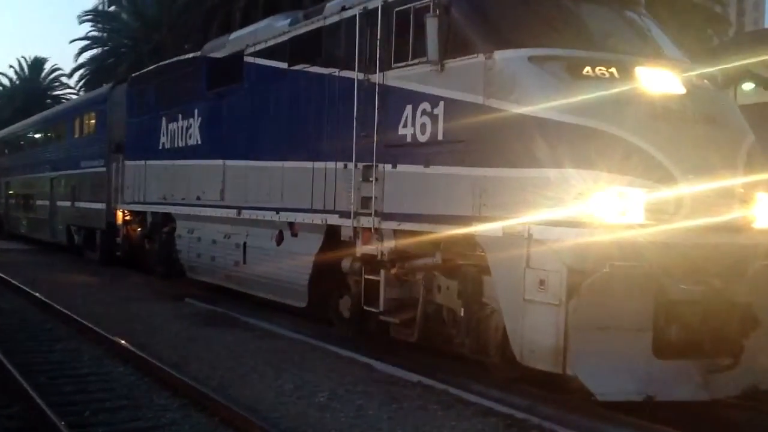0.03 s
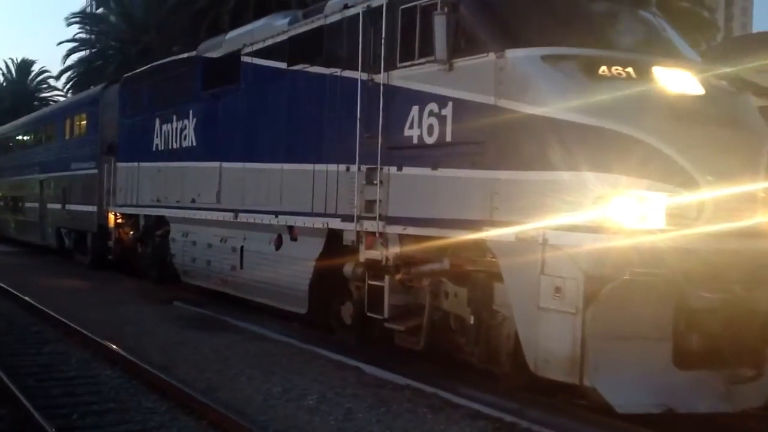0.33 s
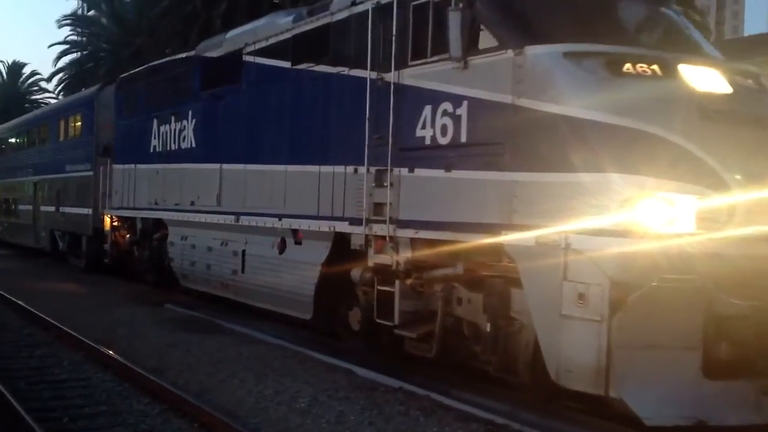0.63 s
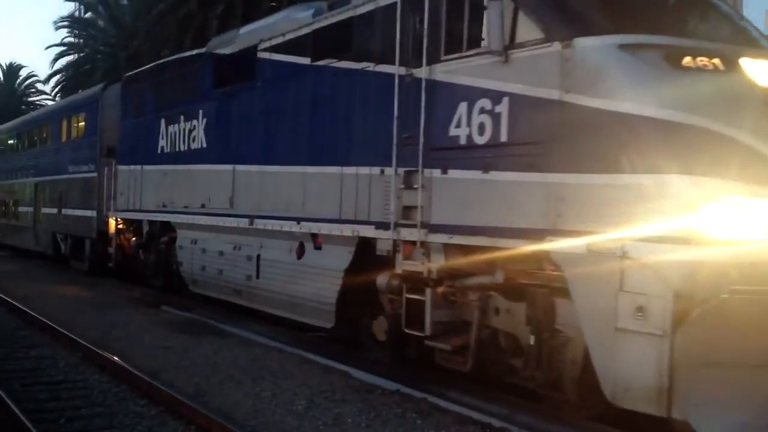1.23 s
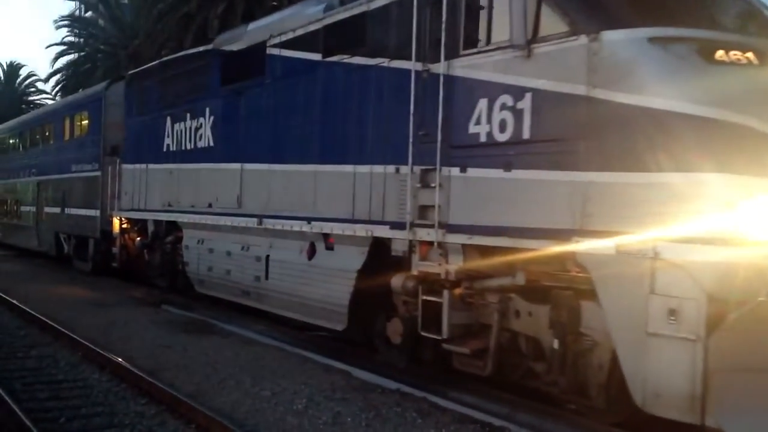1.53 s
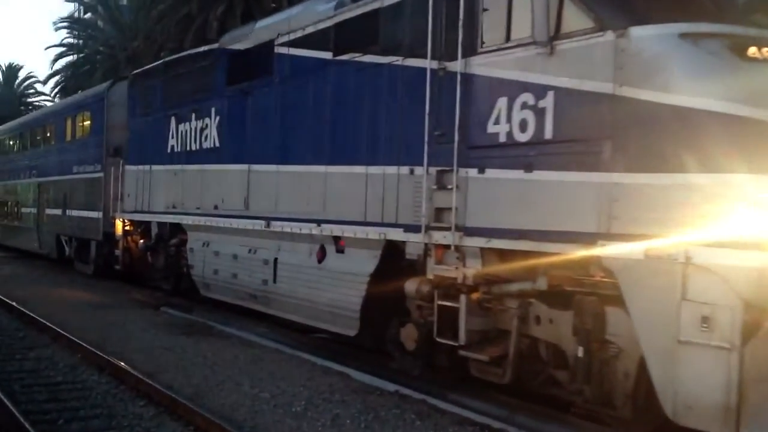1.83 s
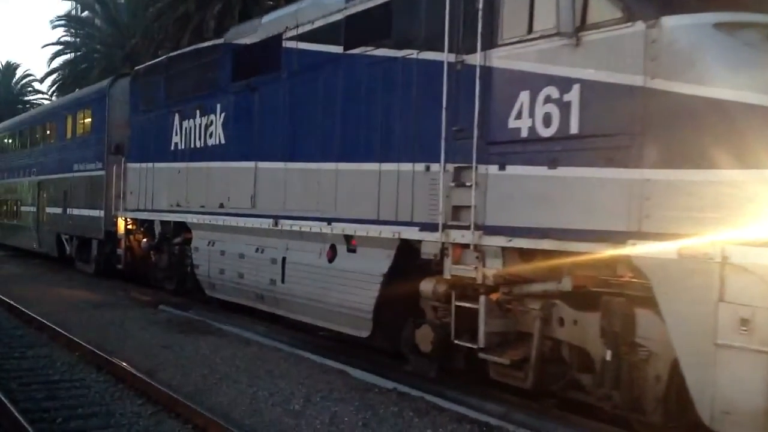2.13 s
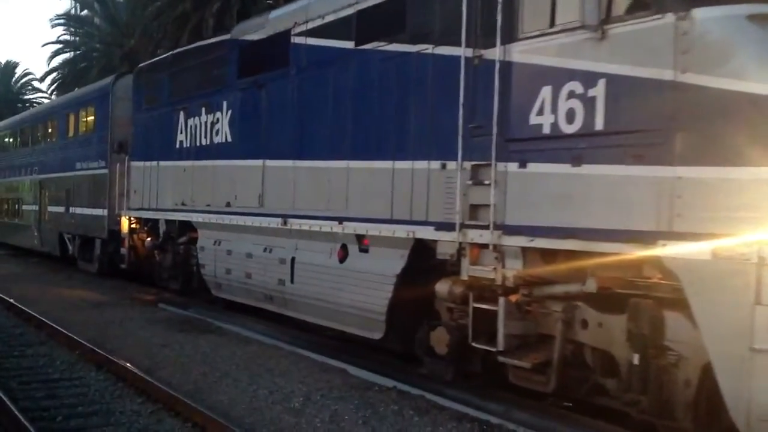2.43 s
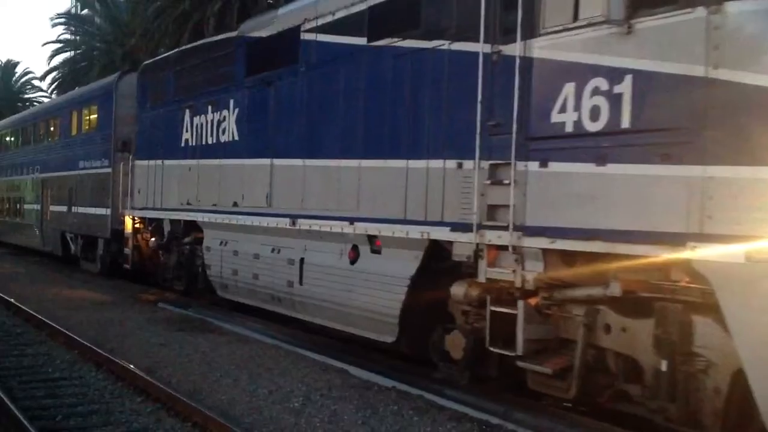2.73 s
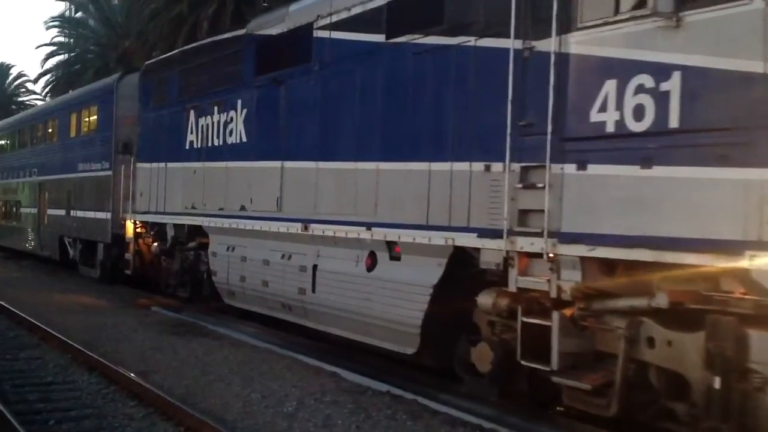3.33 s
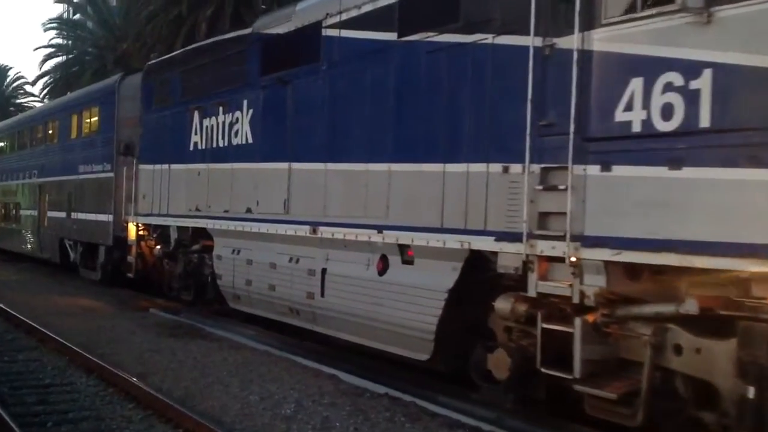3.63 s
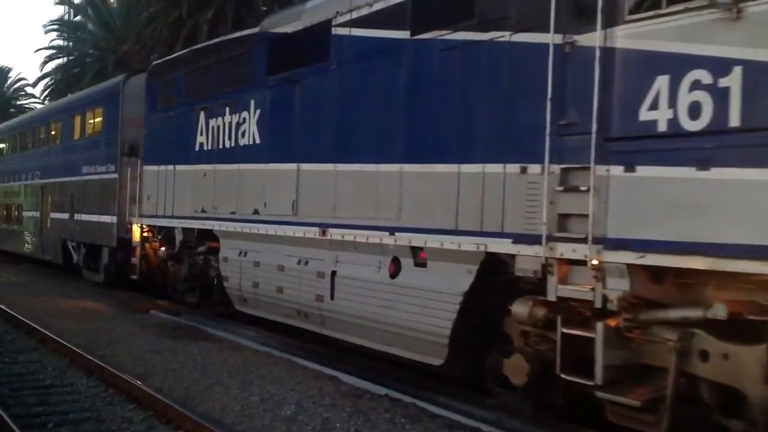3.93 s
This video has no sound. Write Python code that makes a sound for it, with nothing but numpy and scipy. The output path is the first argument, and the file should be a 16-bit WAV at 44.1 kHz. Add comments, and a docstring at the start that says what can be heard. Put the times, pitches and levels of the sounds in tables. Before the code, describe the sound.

A train bell rings steadily as a diesel locomotive rolls slowly past, releasing air.

```python
"""A bell rings out once a second over the rumble and whine of a diesel locomotive rolling slowly past.
Its decaying partials beat against their Doppler-shifted echoes from the station wall.
Firing pulses and exhaust roar make the rumble; fans and turbocharger make the whine.
Turbulent jets add hiss: air leaks faintly and is blown off twice, and the bell's air-driven ringer
spits and puffs between strokes. One microphone with a limiter picks it all up."""
import sys
import numpy as np
from scipy.fft import rfft, irfft, next_fast_len
from scipy.io import wavfile
from scipy.ndimage import uniform_filter1d, map_coordinates

SR = 44100
rng = np.random.default_rng(int(sys.argv[2]) if len(sys.argv) > 2 else 0)


def materialize(psi):
    """Save the field psi as 16-bit PCM at rate SR to the path in sys.argv[1].

    A 1-D psi becomes a single channel; in a 2-D psi each row is a channel.
    """
    bounded = np.clip(np.atleast_2d(psi).T, -1, 1)
    quanta = np.round(bounded * 32767).astype(np.int16)
    wavfile.write(sys.argv[1], SR, quanta)


N = 176400
TIME = np.arange(N) / SR

# bell strokes (time [s], level [dB], tilt [dB/octave], swell of the strongest partial [s],
# echo's Doppler shift [%], echo's initial gain [dB], gain of the middle partials [dB])
STROKES = [(-.02, -1.5, -2.5, 0.01, 0.382, -9, -1), (.946, 0, -1.5, .005, 0.186, -8, -3),
           (1.972, -2, 1, 0.0051, 0.237, -3, 1.5), (2.979, 1, -2, 0.061, 0.06, -6.5, 0),
           (3.957, 0.5, .5, 0.0082, 0.53, -4, -6)]


def amp(db):
    """Decibels to amplitude ratio."""
    return 10 ** (np.asarray(db) / 20)


def unit(x):
    """Normalisation to rms 1."""
    return x / np.sqrt(np.mean(np.abs(x) ** 2) + 1e-20)


def curve(rows):
    """Linear interpolation of (time [s], value) points at every sample."""
    return np.interp(TIME, *np.transpose(rows))


def wobble(rate):
    """Smooth random modulation: a spline through rate knots a second."""
    coarse = map_coordinates(rng.standard_normal(int(N * rate / SR) + 6), [TIME[::32] * rate + 2])
    return np.interp(TIME, TIME[::32], coarse)


def fading(rate):
    """Multipath fading: the random complex gain of a tone arriving over many changing paths."""
    return unit(wobble(rate) + 1j * wobble(rate))


def tone(hz, flutter, width_hz):
    """Line broadening: a sine of rms 1 flutters in level and phase."""
    gain = 1 + flutter * fading(width_hz)
    return unit(np.real(gain * np.exp(2j * np.pi * (hz * TIME + rng.random()))))


def filtered(x, response):
    """Linear filtering: the spectrum of x times a frequency response."""
    size = next_fast_len(N + 8192)
    return irfft(rfft(x, size) * response(np.fft.rfftfreq(size, 1 / SR)), size)[:N]


def coloured(x, spectrum, tilt_db=0):
    """Spectral shaping by (frequency [Hz], gain [dB]) points and a tilt per octave, at rms 1."""
    knots_hz, db = np.transpose(spectrum)
    tilted_db = db + tilt_db * np.log2(knots_hz / knots_hz[0])
    return unit(filtered(x, lambda hz: amp(np.interp(np.log(hz + 1), np.log(knots_hz), tilted_db))))


def noise(spectrum, tilt_db=0):
    """Coloured Gaussian noise of rms 1."""
    return coloured(rng.standard_normal(N), spectrum, tilt_db)


def burst(start, end, rise, t60):
    """Envelope: linear rise from start, hold until end, exponential decay."""
    return np.clip((TIME - start) / rise, 0, 1) * amp(-60 * np.maximum(TIME - end, 0) / t60)


def bell():
    """Interference: damped modes beat against their Doppler-shifted echo and scattered sound."""
    # bell modes (frequency [Hz], relative level [dB], t60 [s], rise [s])
    modes = [(2118, -10, .38, .05), (2375, -5, .85, .004), (3009, -34, .35, .003), (3720, -23, .75, .025),
             (3914, -18.5, 1.5, .005), (5171, -31, .25, .003), (5764, -21.5, .48, .012),
             (5956, -28.5, .35, .005), (6064, -35, .4, .005), (6242, -27, .42, .005), (7734, -34, .6, .004),
             (7852, -27.5, .85, .005), (8685, -54, .5, .003), (10052, -37, .7, .004),
             (10347, -49, .4, .003), (12352, -45, .5, .002), (14740, -51, .28, .002)]
    echo_delay_s, echo_rise_s, echo_growth_db_per_s = 0.052, 0.051, 9
    scatter_share, scatter_db_per_octave, doppler_spread, scatter_rise_s = 0.42, 6.5, 0.007, 0.05
    strongest_hz = max(modes, key=lambda mode: mode[1])[0]
    out = np.zeros(N)
    for hz, db, t60, rise in modes:
        octaves = np.log2(hz / strongest_hz)
        scatter = scatter_share * amp(scatter_db_per_octave * octaves) * fading(doppler_spread * hz)
        wander_rad = octaves * wobble(12)  # high partials beat less evenly
        for start, stroke_db, tilt_db, swell, shift_percent, echo_db, middle_db in STROKES:
            live = (TIME >= start) & (TIME < start + 1.5 * t60)
            t = TIME[live] - start
            onset = np.minimum(t / swell, 1) ** 2 if hz == strongest_hz else 1
            colour_db = tilt_db * octaves + middle_db * (3500 < hz < 4500)
            envelope = onset * (1 - np.exp(-t / rise)) * amp(db + stroke_db + colour_db - 60 * t / t60)
            beat_hz = hz * shift_percent / 100
            echo_phase = 2 * np.pi * beat_hz * (t - echo_delay_s) + wander_rad[live]
            echo_gain = amp(np.minimum(echo_db + echo_growth_db_per_s * t, 0))
            echo_onset = np.clip((t - echo_delay_s) / echo_rise_s + 1, 0, 1)
            echo = echo_gain * echo_onset * np.exp(1j * echo_phase)
            paths = 1 + echo + scatter[live] * np.minimum(t / scatter_rise_s, 1)
            out[live] += envelope * np.real(paths * np.exp(2j * np.pi * (hz * t + rng.random())))
    return out


def clapper():
    """Impact excitation: each blow on the bell gives a brief broadband clank."""
    # clank spectrum (frequency [Hz], relative level [dB])
    spectrum = [(300, -70), (900, -6), (1500, -20), (2200, 4.5), (3000, -7), (4500, -16.5), (6000, -7.5),
                (8500, -37), (15000, -42)]
    blows = sum(amp(db - 19) * burst(start, start, rise=0.0025, t60=0.19) for start, db, *_ in STROKES)
    return blows * noise(spectrum)


def bell_hum():
    """Amplitude modulation: the long-lived lowest partial swells and fades as the bell moves."""
    # hum contour (time [s], relative level [dB])
    levels = [(0.0, -40), (0.28, -40.5), (0.33, -52), (0.43, -35.5), (0.91, -49), (1.2, -29.5),
              (1.3, -39.5), (1.46, -30.5), (1.92, -52.5), (2.0, -28), (2.28, -45), (3.05, -36.5),
              (3.16, -47.5), (3.41, -27), (3.63, -35), (3.75, -51), (3.92, -52), (4.0, -30)]
    return amp(curve(levels) + 3) * tone(1105.8, flutter=0.3, width_hz=13)


def exhaust():
    """Source and filter: unequal firing pulses and roar take on the exhaust's resonances."""
    # exhaust response (frequency [Hz], gain [dB])
    response = [(20, -50), (37, -43), (48, -15.5), (70, -18), (115, -16), (138, -1.5), (190, 3),
                (260, -1.5), (390, 0.5), (500, -11.5), (800, -9.5), (1400, -18), (2500, -42)]
    # rumble contour (time [s], level [dB])
    levels = [(0, -34), (.6, -30), (1.2, -32.5), (1.8, -30.5), (1.87, -27.5), (2.1, -31), (2.8, -28.5),
              (3.5, -30), (4, -27)]
    shaft_hz, cylinders, cylinder_spread, firing_db = 14.85, 12, 0.73, -8
    count = int(N / SR * shaft_hz * cylinders)
    sizes = np.resize(1 + cylinder_spread * unit(rng.standard_normal(cylinders)), count)
    time_jitter, size_jitter = rng.standard_normal((count, 2)).T
    times = (np.arange(count) + 0.247 * time_jitter) / (shaft_hz * cylinders)
    samples = np.clip(times * SR, 0, N - 1).astype(int)
    pulses = np.bincount(samples, sizes * (1 + 0.25 * size_jitter), N)
    firing = amp(firing_db) * coloured(pulses - pulses.mean(), response)
    roar = noise(response)
    chug = amp(0.74 * wobble(45))
    return amp(curve(levels)) * unit((roar + firing) * chug)


def machinery():
    """Rotational noise: shaft, fans and turbocharger radiate tones over a broadband rush."""
    # engine shaft orders (frequency [Hz], relative level [dB], flutter [ratio])
    shaft_tones = [(89, -50, .4), (134.8, -44.5, 0.73), (178.7, -44.5, 0.97), (237.4, -39, 0.28),
                   (539, -56, 1)]
    # fan and turbocharger whines (frequency [Hz], relative level [dB], flutter [ratio])
    whine_tones = [(904, -44, 0.37), (991, -54.5, .5), (3180, -44.5, 1.2), (5376, -46, 1.4),
                   (10770, -59, 1.2)]
    # the whines emerge as the locomotive nears (time [s], gain [dB])
    approach = [(0, -5), (1.05, -4), (1.3, -0.5), (4, 1)]
    # rush spectrum (frequency [Hz], relative level [dB])
    rush_spectrum = [(150, -65), (500, -10), (1400, -3), (2100, 7.5), (3200, 6.5), (4400, -3.5), (6000, -3),
                     (8000, -9), (10000, -21), (15000, -37)]
    # rush contour (time [s], level [dB])
    rush_levels = [(0, -36), (1.3, -36.5), (2, -35), (2.9, -34.5), (4, -32)]
    orders, whines = (
        sum(amp(db) * tone(hz, flutter, width_hz=6 + 0.006 * hz) for hz, db, flutter in tones)
        for tones in (shaft_tones, whine_tones))
    rush = amp(curve(rush_levels) + 0.39 * wobble(30.32)) * noise(rush_spectrum)
    return orders + amp(curve(approach)) * whines + rush


def air_leaks():
    """Turbulence: escaping air hisses faintly."""
    # leaks (start [s], end [s], level [dB], tilt [dB/octave])
    leaks = [(-.2, 0.425, -37, -11.5), (1.155, 1.378, -45.5, 14)]
    # hiss spectrum (frequency [Hz], relative level [dB])
    spectrum = [(500, -64), (5000, -7), (5900, 7), (7500, -1), (10000, -4), (13500, -1.5), (15500, -4)]
    return sum(amp(db) * burst(start, end, rise=0.06, t60=0.44) * noise(spectrum, tilt_db)
               for start, end, db, tilt_db in leaks)


def blowoffs():
    """Jet noise and resonance: a valve opens smoothly and air hisses through a whistling nozzle."""
    # valve openings (start [s], end [s], level [dB], tilt [dB/octave])
    openings = [(0.392, 0.721, -13, -1.5), (3.762, 4.2, -22.5, 0.2)]
    # jet spectrum (frequency [Hz], relative level [dB])
    spectrum = [(150, -70), (600, -21.5), (1500, -18), (2100, -10), (2650, -1.5), (3050, -2), (3550, 2),
                (4100, -5.5), (4900, -9), (6400, -2.5), (8000, -5), (10500, -11), (15000, -13)]
    # narrow nozzle resonances (frequency [Hz], relative level [dB])
    resonances = [(2686, -19), (3123, -19.5), (3548, -13.5), (7058, -23)]
    whistle = sum(amp(db) * tone(hz, flutter=3, width_hz=45) for hz, db in resonances)
    out = np.zeros(N)
    for start, end, db, tilt_db in openings:
        jet = noise(spectrum, tilt_db) + whistle
        out += amp(db + 0.23 * wobble(40)) * burst(start, end, rise=0.17, t60=0.34) * jet
    return out


def ringer():
    """Transient jets: the bell's air motor spits before a stroke and puffs on its return."""
    # spits of air (time [s], level [dB], t60 [s])
    spits = [(0.886, -30, 0.24), (1.812, -35.5, 0.47), (1.849, -43, 0.35), (1.904, -35, 0.52),
             (2.815, -32, 0.15), (2.845, -35, 0.39), (2.907, -30, 0.38)]
    # spit spectrum (frequency [Hz], relative level [dB])
    spit_spectrum = [(300, -48), (1500, -2), (3200, 4), (4500, -1.5), (7000, 1.5), (8500, -4), (9800, 2.5),
                     (11000, -15), (15000, -18)]
    # exhaust puffs (time [s], level [dB])
    puffs = [(1.668, -28), (2.666, -26), (3.642, -28)]
    # puff spectrum (frequency [Hz], relative level [dB])
    puff_spectrum = [(150, -58), (600, -20), (1400, -6), (2100, 8.5), (3000, 4.5), (4400, -11),
                     (6000, -1.5), (8500, -14), (9600, -6), (11500, -16.5), (15000, -23)]
    spitting = sum(amp(db) * burst(at, at + 0.0038, rise=0.0021, t60=t60) for at, db, t60 in spits)
    puffing = sum(amp(db) * burst(at, at + 0.025, rise=0.0024, t60=0.32) for at, db in puffs)
    return puffing * noise(puff_spectrum) + spitting * noise(spit_spectrum)


def scene():
    """Superposition: all sources add at one microphone, the same in both channels."""
    mono = bell() + clapper() + bell_hum() + exhaust() + machinery() + air_leaks() + blowoffs() + ringer()
    return np.tile(mono, (2, 1))


def record(dry):
    """Peak limiting with fast attack and slow release, then a low-pass band limit."""
    ceiling_db, release_db_per_s, cutoff_hz = -3.5, 42, 15450
    peak_db = 20 * np.log10(np.abs(dry).max(axis=0) + 1e-9)
    over_db = np.maximum(peak_db - ceiling_db, 0)
    recovery_db = release_db_per_s * TIME
    held_db = np.maximum.accumulate(over_db + recovery_db) - recovery_db
    gain = amp(-uniform_filter1d(held_db, size=60))
    return np.array([filtered(channel * gain, lambda hz: hz < cutoff_hz) for channel in dry])


dry = scene()
out = record(dry)
materialize(out)
```